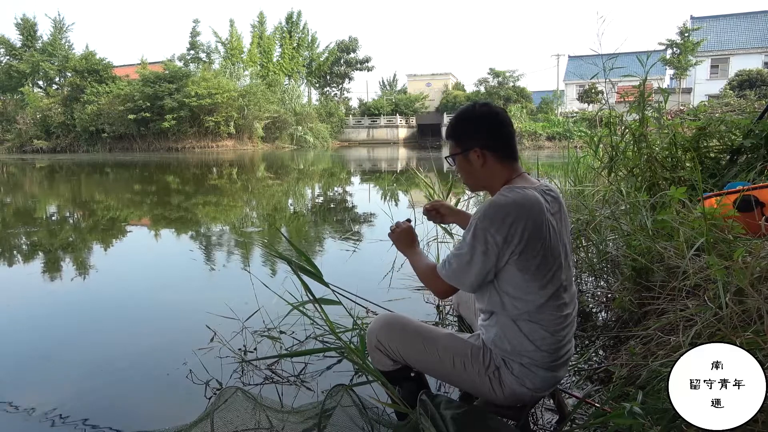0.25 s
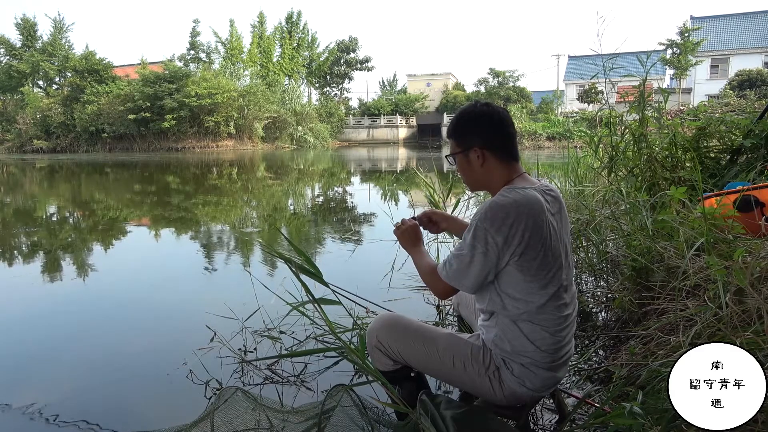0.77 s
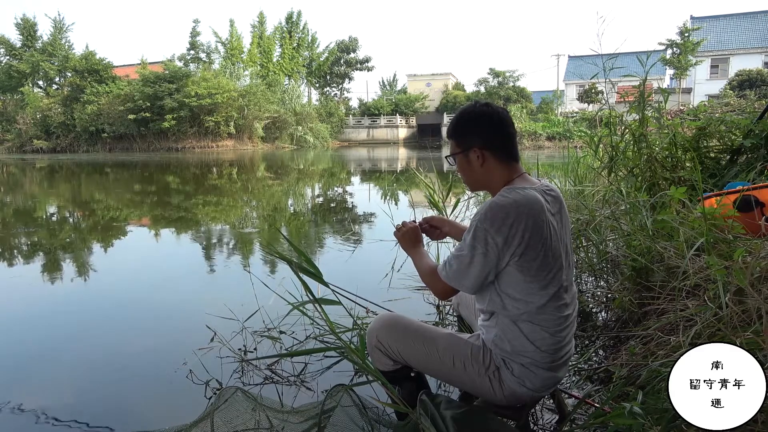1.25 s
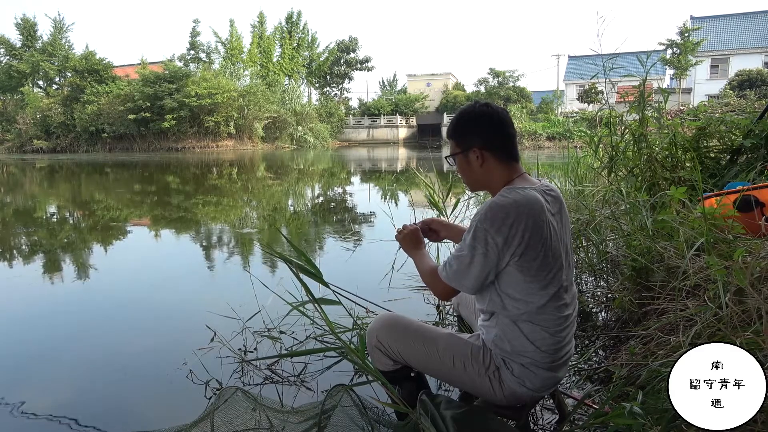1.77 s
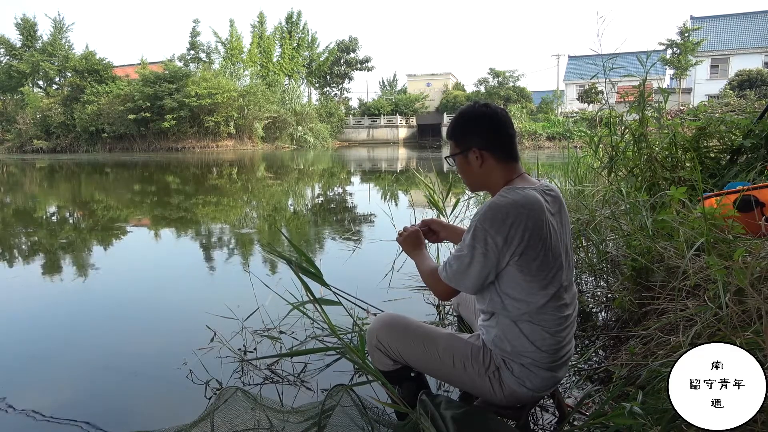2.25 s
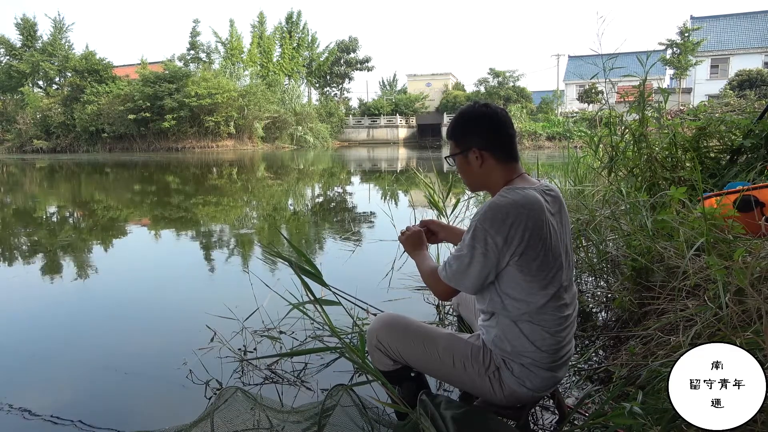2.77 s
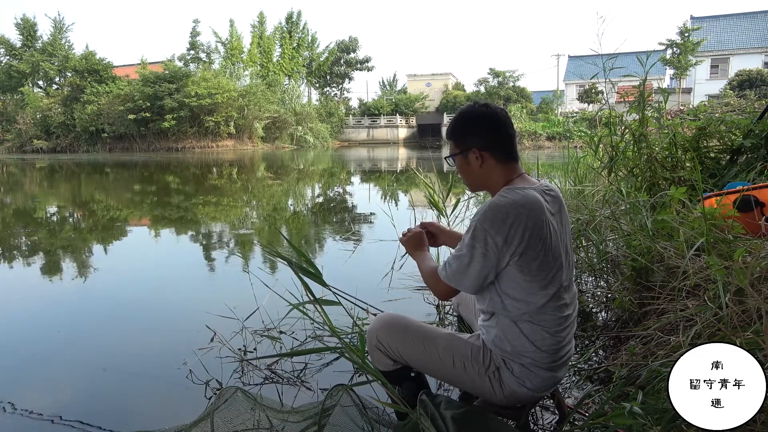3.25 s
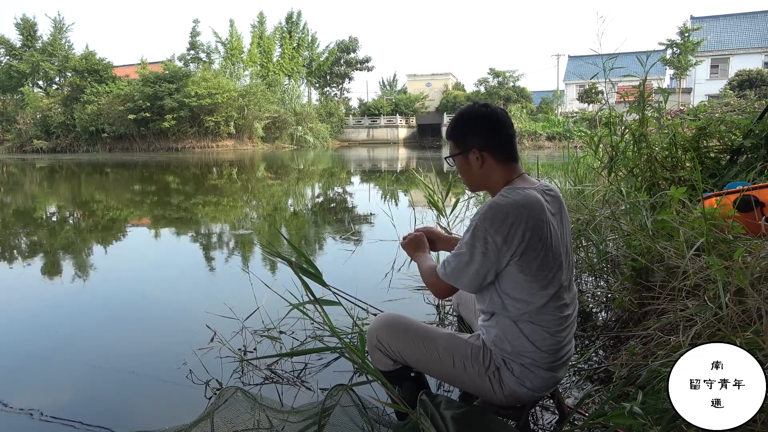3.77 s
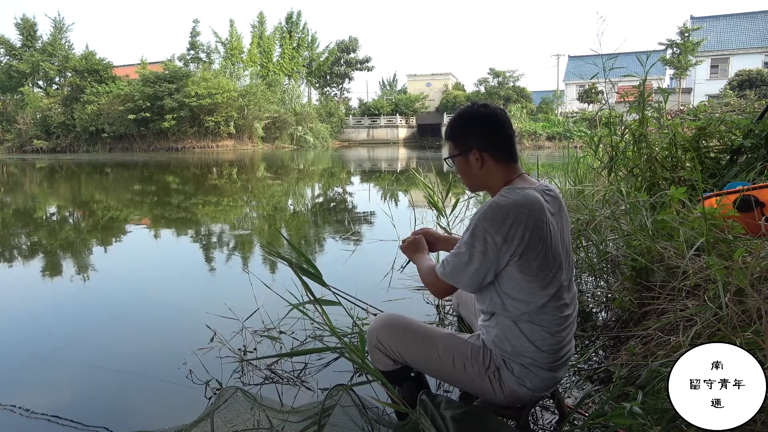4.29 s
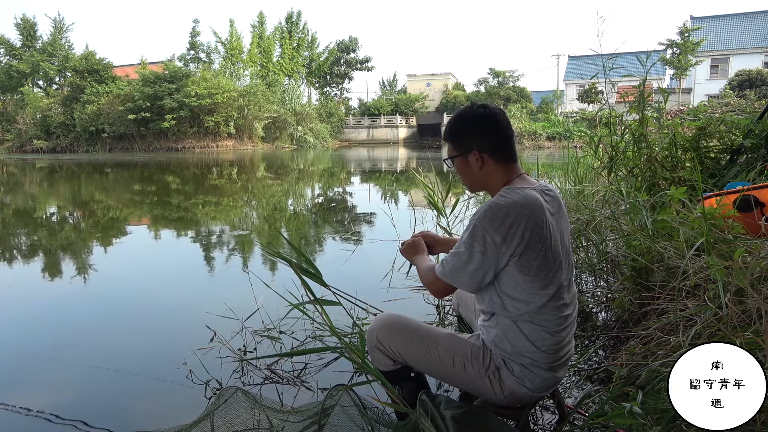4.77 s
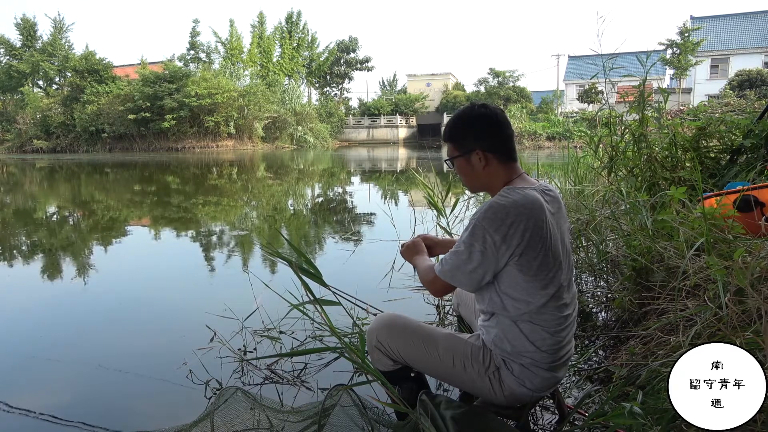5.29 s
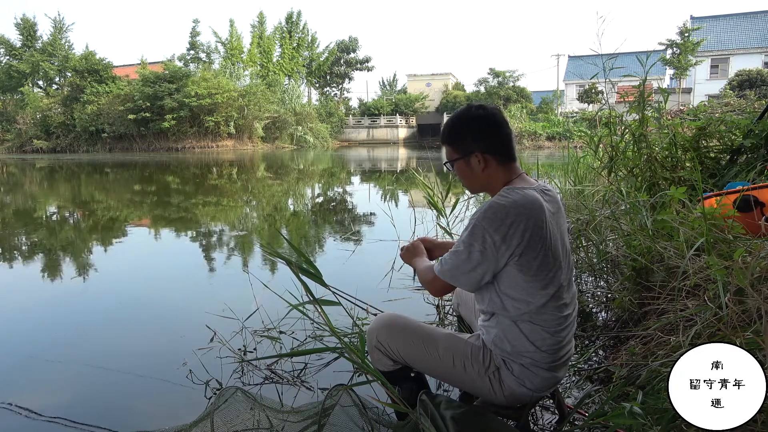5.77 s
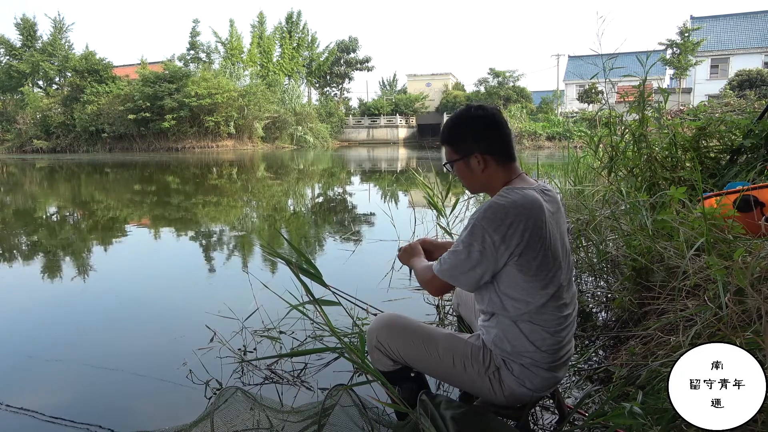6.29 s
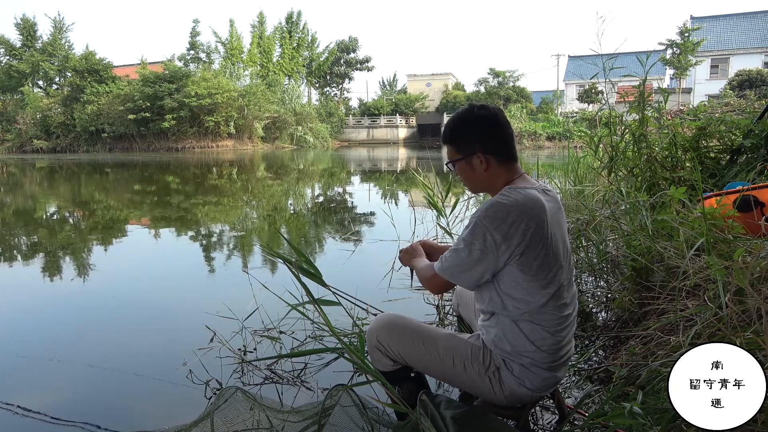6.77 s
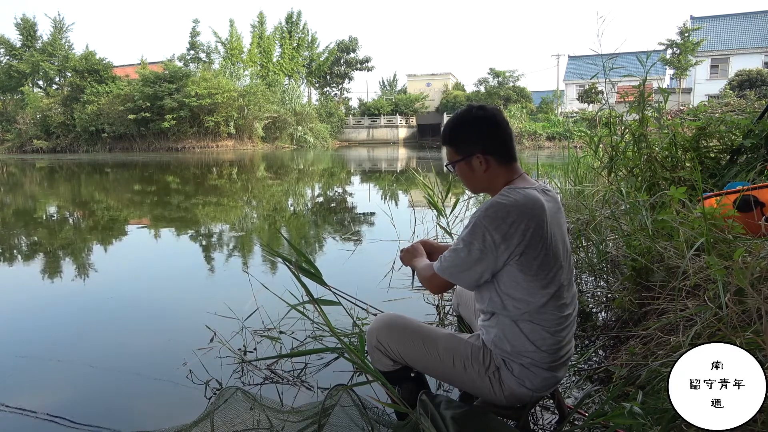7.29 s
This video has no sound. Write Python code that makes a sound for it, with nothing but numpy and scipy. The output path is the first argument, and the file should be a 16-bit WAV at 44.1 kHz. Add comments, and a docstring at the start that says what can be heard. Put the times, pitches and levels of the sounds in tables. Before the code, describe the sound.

Outdoors beside calm water, many cicadas sing a continuous bright sizzle, wide in stereo. The deeper buzz in front gives way to a coarser one swelling at left. Far vehicles pass as a low murmur. Quiet scuffs of fingers on line and cloth come near the start and scatter later; short, falling bird chirps repeat through the second half, with a single dull water plop among them.

```python
"""A steady, high cicada chorus is heard first, with a deeper singer swelling on the left and another
fading ahead: trains of tymbal clicks, scattered by leaves and water, are blurred with noise and filtered.
Under them lie filtered noise for distant land and road, and a faint motor hum of wavering sines.
An angler's hands rustle as grainy resonant noise, a far bird chirps in falling partials, and a drop
plops in the pond as two decaying sines."""
import sys
import numpy as np
from scipy import signal
from scipy.fft import rfft, irfft, next_fast_len
from scipy.io import wavfile
from scipy.ndimage import uniform_filter1d

SR = 44100
rng = np.random.default_rng(int(sys.argv[2]) if len(sys.argv) > 2 else 0)


def master(y):
    """Save y as 16-bit WAV."""
    cut = np.clip(np.atleast_2d(y).T, -1, 1)
    pcm = np.round(cut * 32767)  # scale
    wavfile.write(sys.argv[1], SR, pcm.astype(np.int16))


N = 332469
T = np.arange(N) / SR  # time [s]


def amp(db):
    """Decibel definition: the amplitude ratio of a level in dB."""
    return 10 ** (np.asarray(db) / 20)


def evened(x):
    """Normalization: scales each channel to an rms of 1."""
    return x / np.sqrt(np.mean(x ** 2, axis=-1, keepdims=True) + 1e-20)


def read(points, hz):
    """Logarithmic interpolation: every level column of a spectrum at the frequencies hz."""
    f, *columns = np.transpose(points)
    return np.array([np.interp(np.log(hz + 1), np.log(f + 1), c) for c in columns])


def slow(top_hz):
    """Superposition: slow sines from 0.2 Hz to top_hz sum to a random drift of rms 1."""
    rates = np.geomspace(.2, top_hz, num=12)
    waves = sum(np.sin(2 * np.pi * (f * T + rng.random())) / np.sqrt(f) for f in rates)
    return evened(waves)


def pair(size, same):
    """Interchannel coherence: two noises whose correlation is same."""
    a, b = rng.standard_normal((2, size))
    return np.array([a, same * a + np.sqrt(1 - same ** 2) * b])


def both(x, pan_db):
    """Level-difference panning: splits pan_db evenly between left and right."""
    return x * amp([pan_db / 2, -pan_db / 2]).reshape(2, -1)


def glide(middle_s, gradual_s, before, after):
    """Logistic transition: a smooth change from one value to another."""
    return before + (after - before) / (1 + np.exp((middle_s - T) / gradual_s))


def bell(s, half_s):
    """Gaussian envelope: rises to 1 at time s and falls away again."""
    return np.exp(-((T - s) / half_s) ** 2)


def colour(x, body, modes=()):
    """Spectral shaping: gives white sound of rms 1 the spectrum body [dB per Hz], lifted by resonant modes."""
    size = next_fast_len(N)
    hz = np.fft.rfftfreq(size, 1 / SR)
    mode_db = sum(lift / (1 + (2 * (hz - f) / width) ** 2) for f, width, lift in modes)
    gain = amp(read(body, hz) + mode_db)
    inside = (hz > body[0][0]) & (hz < body[-1][0])
    density = np.sqrt(SR / 2)  # white sound of rms 1 spreads over SR / 2
    return irfft(rfft(x, size) * gain * inside * density, size)[:, :N]


def resonate(x, hz, width):
    """Heterodyne resonance: shifts the curve hz down to zero, smooths twice and shifts back."""
    turn = np.exp(2j * np.pi * np.cumsum(hz * np.ones(x.shape[-1])) / SR)
    r = np.exp(-np.pi * width / SR)
    smoothed = signal.lfilter([(1 - r) ** 2], [1, -2 * r, r * r], x / turn)
    return 2 * (turn * smoothed).real


def singer(rate, jitter_s, count, throb, same, leaves_db, t60):
    """Impulsive excitation: tymbal clicks, swelling every sixth, convolved with scatter off leaves and water."""
    turns = np.cumsum(rate * (1 + .002 * slow(top_hz=2))) / SR + rng.random()
    at = np.flatnonzero(np.diff(np.floor(turns)))  # one click each whole turn
    shift, size = rng.standard_normal((N // 50, 2))[:len(at)].T
    strength = (1 + throb * np.cos(2 * np.pi * turns[at] / 6)) * amp(2.5 * size)
    jittered = at + np.round(shift * jitter_s * SR).astype(int)
    clicks = np.zeros(N)
    np.add.at(clicks, np.clip(jittered, 0, N - 1), strength)
    t = np.arange(SR // 2) / SR
    path = pair(len(t), same) * amp(-60 * t / t60)
    path *= amp(leaves_db) / np.linalg.norm(path[0])
    # the direct sound reaches each microphone within the first count samples
    path[[0, 1], rng.integers(0, count, size=2)] += 1
    return evened(signal.fftconvolve(clicks[None] - clicks.mean(), path, axes=1)[:, :N])


# the high chorus before its modes:
# (frequency [Hz], left level [dB per Hz], right level [dB per Hz])
CHORUS_SPECTRUM = [(2620, -112, -112), (3100, -102, -104), (3650, -82.5, -85.5), (4230, -83, -93),
                   (4950, -98, -88), (5460, -78, -77), (6060, -69, -72.5), (6490, -72, -78.5),
                   (7220, -68.5, -73.5), (7490, -59.5, -68.5), (8040, -63.5, -65), (8725, -65.5, -73.5),
                   (9720, -78, -79.5), (11030, -87.5, -89.5), (12900, -96.5, -96.5), (14800, -101, -101),
                   (16000, -109, -109)]
# body modes that shape the chorus: (frequency [Hz], width [Hz], lift [dB])
CHORUS_BODY_MODES = [(7100, 41, 7), (7220, 60, 2), (7740, 42, 4.5), (7800, 144, -4), (7430, 37, -14),
                     (8190, 74, 3.5), (8540, 30, -4), (9350, 150, 2), (8850, 49, 2), (8610, 40, 7)]
# its nearest singers: (click rate [1/s], relative left level [dB], relative right level [dB])
NEAR_SINGERS = [(437, 2.5, -4), (508.4, 1, -2), (398.4, -11.5, -7), (472.4, 0.5, -1), (346.7, -2.5, -6.5),
                (539.5, -2.5, -11), (293.5, -1.5, -1.5)]


def chorus():
    """Incoherent addition: a few near click trains stand over the noise blur of many far singers."""
    near = sum(singer(rate, count=6, jitter_s=.00012, throb=0, same=0.16, leaves_db=2.5, t60=0.31)
               * amp([[left_db], [right_db]])
               for rate, left_db, right_db in NEAR_SINGERS)
    far = pair(N, same=0.054)
    blend = evened(evened(near) + amp(-4.5) * far)
    swell = amp(.4 * slow(top_hz=12))
    return swell * colour(blend, CHORUS_SPECTRUM, CHORUS_BODY_MODES)


# the left singer in full voice: (frequency [Hz], left level [dB per Hz], right level [dB per Hz])
LEFT_SPECTRUM = [(2270, -98.5, -110), (3053, -79.5, -104), (3344, -70.5, -87.5), (4280, -69.5, -84.5),
                 (4530, -63.5, -95), (5180, -68, -96), (5500, -66.5, -84), (6570, -71, -90),
                 (7340, -74, -80), (9000, -79.5, -99), (10050, -84, -100), (14800, -101, -104)]
# the singer ahead in full voice: (frequency [Hz], left level [dB per Hz], right level [dB per Hz])
AHEAD_SPECTRUM = [(2590, -112, -112), (2990, -99, -97), (3443, -75.5, -81), (4100, -83.5, -94.5),
                  (4270, -74.5, -73), (4790, -74.5, -82.5), (5100, -79, -82), (6000, -82.5, -79)]
# how strongly each sings: (time [s], left singer's effort [dB], effort of the singer ahead [dB])
SINGING_EFFORT = [(0, -20, -1.5), (1.302, -15.5, -1.5), (2.4, -6.5, -1.5), (3.2, -6.5, -3.5),
                  (4.898, -2, -10), (6.4, -1, -17), (7.54, 0, -18)]


def deep_singers():
    """Source-filter principle: body spectra filter slower click trains, one swelling left, one fading ahead."""
    s, left_db, ahead_db = np.transpose(SINGING_EFFORT)
    left_db, ahead_db = np.interp(T, s, left_db), np.interp(T, s, ahead_db)
    left = singer(274, count=1, jitter_s=.00015, throb=.4, same=.7, leaves_db=11, t60=.35)
    ahead = singer(232, count=1, jitter_s=.0002, throb=0.24, same=0.98, leaves_db=9.0, t60=0.17)
    # noise stands for the neighbours that blur both
    left = evened(left + amp(1.5) * pair(N, same=.8))
    ahead = evened(ahead + amp(-2.5) * pair(N, same=0.94))
    left_gain = amp(left_db + .5 * slow(top_hz=11))
    ahead_gain = amp(ahead_db + 1.2 * slow(top_hz=10))
    return left_gain * colour(left, LEFT_SPECTRUM) + ahead_gain * colour(ahead, AHEAD_SPECTRUM)


# the distant low wash, mid signal: (frequency [Hz], level [dB per Hz])
WASH_SPECTRUM = [(15, -81), (32, -88), (55, -76), (110, -79), (280, -84), (400, -86.5), (550, -89.5),
                 (900, -86), (1300, -96.5), (1700, -98), (2200, -96.5), (2700, -99.5), (3300, -102)]
# stereo width of that wash: (frequency [Hz], side minus mid [dB])
WASH_SIDE = [(40, -33), (80, -30), (160, -23), (320, -14), (600, -12), (1000, -11), (1500, -11), (3000, -9)]
# heavy engines swelling out of the rumble: (loudest time [s], lift [dB], half length [s])
ENGINE_SWELLS = [(1.2, 2, 0.26), (2.2, 2.5, 0.23), (3.1, 7.5, 0.32), (3.8, 3, .3), (5.3, 8.5, 0.56),
                 (7.5, 0, 0.58)]
# vehicles on the far road:
# (nearest time [s], lift of the tyre roar [dB], half length [s], pitch fall factor [share])
ROAD_PASSES = [(.15, 3, 0.43, .02), (1.053, 6.5, 0.57, .1), (2.5, 1, 0.42, 0.029), (3.7, 2.5, 0.27, 0.01),
               (5.5, 2, 0.56, 0.056), (7.2, 1, .5, .01)]
# tyre-roar resonances: (frequency [Hz], width [Hz], relative gain [dB])
ROAR_RESONANCES = [(672.7, 30, 8), (792.4, 130, 8), (946, 220, -11.5)]
# the roar moves left: (middle time [s], gradualness [s], left-right before [dB], left-right after [dB])
ROAR_PAN = (2.6, .5, 0, 7.5)
# motor hum, about which pitch and level waver: (frequency [Hz], rms level [dB])
HUM_TONES = [(300, -66.5), (408, -73), (1353, -77.5)]
RUMBLE_DB, ROAR_DB = -61, -59.5  # rms levels between vehicles [dB]


def far_air():
    """Mid-side stereo: close microphones receive noise whose bass is nearly mono."""
    size = next_fast_len(N)
    hz = np.fft.rfftfreq(size, 1 / SR)
    mid, side = rfft(rng.standard_normal((2, size)))
    side = side * amp(read(WASH_SIDE, hz)[0])
    return irfft(np.array([mid + side, mid - side]), size)[:, :N]


def engine_rumble(air):
    """Low-frequency resonance: a band near 186 Hz swells with each heavy engine."""
    level_db = RUMBLE_DB + sum(lift * bell(s, half_s) for s, lift, half_s in ENGINE_SWELLS)
    return amp(level_db) * evened(resonate(air, 186, 148))


def tyre_roar(air):
    """Doppler effect: resonant noise is higher as a vehicle comes, lower as it goes, and drifts left."""
    level_db = ROAR_DB + sum(lift * bell(s, half_s) for s, lift, half_s, drop in ROAD_PASSES)
    pitch = 1 + sum(drop * (s - T) / half_s * bell(s, half_s) for s, lift, half_s, drop in ROAD_PASSES)
    roar = evened(sum(amp(db) * resonate(air, f * pitch, width) * amp(1.2 * slow(top_hz=8))
                      for f, width, db in ROAR_RESONANCES))
    return both(roar * amp(level_db), glide(*ROAR_PAN))


def motor_hum():
    """Frequency and amplitude modulation: faint sines waver slowly in pitch and level."""
    hum = np.zeros(N)
    for f, db in HUM_TONES:
        level = np.sqrt(2) * amp(db + 2.0 * slow(top_hz=2.8))
        hum += level * np.sin(2 * np.pi * np.cumsum(f + 1.44 * slow(top_hz=4)) / SR)
    return hum


def distance():
    """Superposition of remote sources: low wash, engine rumble, tyre roar and hum."""
    air = far_air()
    later = np.roll(air, N // 2, axis=1)  # an unrelated stretch of the same air
    return colour(air, WASH_SPECTRUM) + engine_rumble(later) + tyre_roar(later) + motor_hum()


# hands on line and cloth: (time [s], length [s], rms level before fading [dB], centre [Hz])
HAND_RUSTLES = [(0.803, 0.25, -52, 1850), (0.949, 0.21, -55.5, 2150), (2.252, .11, -54, 1500),
                (4.14, .1, -56, 1350), (4.505, .12, -52.5, 2420), (5.64, 0.18, -58, 1600),
                (5.99, 0.12, -60, 1450), (6.692, .08, -61.5, 1800), (6.907, 0.15, -54.5, 2200),
                (7.38, 0.2, -54.5, 2010)]
# the bubbles of a dull plop:
# (time [s], level before onset and decay [dB], frequency [Hz], 60 dB decay time [s])
PLOP_BUBBLES = [(3.859, -27, 740, 0.029), (3.861, -29.5, 910, 0.034)]


def angler():
    """Friction noise and bubble resonance: grainy rubs of hands, and two bubbles ringing in one plop."""
    out = np.zeros(N)
    for s, length, db, hz in HAND_RUSTLES:
        grains = rng.standard_normal(SR // 4) * amp(2.0 * rng.standard_normal(SR // 4))
        uneven = amp(1.6 * evened(uniform_filter1d(rng.standard_normal(SR // 4), size=500)))
        rub = evened(uneven * resonate(grains, hz, 0.77 * hz))[:round(length * SR)]
        fade = np.sin(np.pi * np.linspace(0, 1, len(rub)) ** 0.64) ** 1.95
        part = out[round(s * SR):][:len(rub)]
        part += amp(db) * (rub * fade)[:len(part)]
    t = np.arange(SR // 10) / SR
    for s, db, hz, t60 in PLOP_BUBBLES:
        onset = 1 - np.exp(-t / 0.005)
        out[round(s * SR):][:len(t)] += np.sin(2 * np.pi * hz * t) * onset * amp(db - 60 * t / t60)
    return both(out, pan_db=0.5)


# bird chirps: (start [s], second-partial level before rasp and pan [dB], its mid pitch [Hz],
# length [s], fall [share of pitch], left-right [dB])
BIRD_CHIRPS = [(2.908, -59, 1850, .025, .1, 6), (2.972, -50.5, 2270, .045, .11, 2),
               (3.038, -63, 2210, .04, .03, 2), (3.166, -61, 2320, 0.043, .08, 10),
               (3.225, -50, 2540, .035, .05, 8), (3.25, -52, 2640, .03, .14, -1),
               (3.584, -45.5, 2410, .049, 0.094, 2), (3.789, -56.5, 2380, .041, .13, 9),
               (3.991, -45.5, 2340, 0.04, 0.095, -1), (4.028, -53, 2340, .05, 0.041, 0),
               (4.086, -54, 2350, .03, .05, 0), (4.188, -51.5, 2330, 0.036, .1, -2),
               (4.348, -52, 2445, .045, .03, 1), (4.367, -54, 2140, 0.034, .13, -1),
               (4.772, -48, 2295, 0.063, 0.025, 2), (4.965, -62, 2300, .03, .06, -1),
               (5.224, -49.5, 2233, 0.044, .15, 0), (5.422, -61, 2290, .027, .06, 2),
               (5.658, -48, 2180, 0.047, .056, 1), (5.859, -62, 2180, 0.032, .08, 2),
               (6.119, -50.5, 2410, .036, .16, -1), (6.527, -53, 2340, .035, .15, 1.5),
               (6.715, -52.5, 2620, .062, .027, 8), (7.077, -54, 2620, .034, .1, 3)]


def bird():
    """Harmonic synthesis: falling chirps, a weak fundamental under a strong second partial, with echo tail."""
    out = np.zeros((2, N))
    for s, db, hz, length, fall, pan_db in BIRD_CHIRPS:
        u = np.arange(0, 1, 1 / (length * SR))  # progress through the chirp
        wobble = evened(uniform_filter1d(rng.standard_normal(SR // 10), size=120))[:len(u)]  # unsteady pitch
        turns = np.cumsum(hz / 2 * (1 + fall * (.5 - u) + .022 * wobble)) / SR
        tone = np.sin(4 * np.pi * turns)
        tone += amp(-10.5) * np.sin(2 * np.pi * turns)
        tone += amp(-16) * np.sin(6 * np.pi * turns)
        rasp = uniform_filter1d(rng.standard_normal(SR // 10), size=40)[:len(u)]  # an uneven, ragged throat
        tone *= 1 + 0.32 * evened(rasp)
        part = out[:, round(s * SR):][:, :len(u)]
        part += both(amp(db) * tone * np.sin(np.pi * u ** 0.82), pan_db)
    t = np.arange(SR // 4) / SR
    tail = rng.standard_normal((2, len(t))) * amp(-60 * t / 0.14) * (t > .01)
    echo = signal.fftconvolve(out, tail / np.linalg.norm(tail[0]), axes=1)[:, :N]
    return out + amp(-7.5) * echo


def scene():
    """Linear superposition: the sound fields of all sources add."""
    return chorus() + deep_singers() + distance() + angler() + bird()


def record(dry):
    """Low-pass filtering: the band limit of the recorder, at 15700 Hz."""
    lowpass = signal.firwin(511, 15700, window=("kaiser", 9), fs=SR)
    return signal.oaconvolve(dry, lowpass[None], "same")


dry = scene()
out = record(dry)
master(out)
```